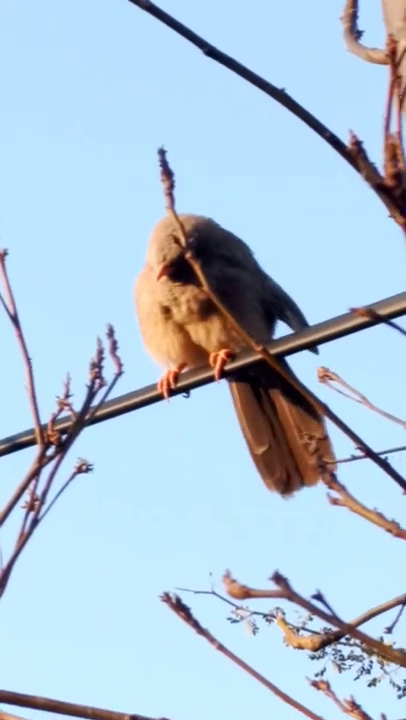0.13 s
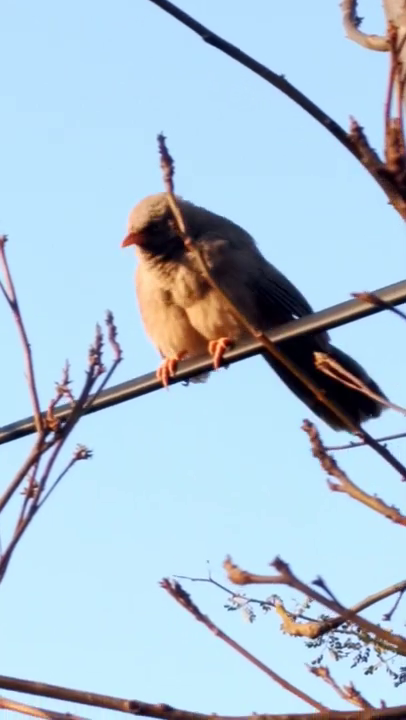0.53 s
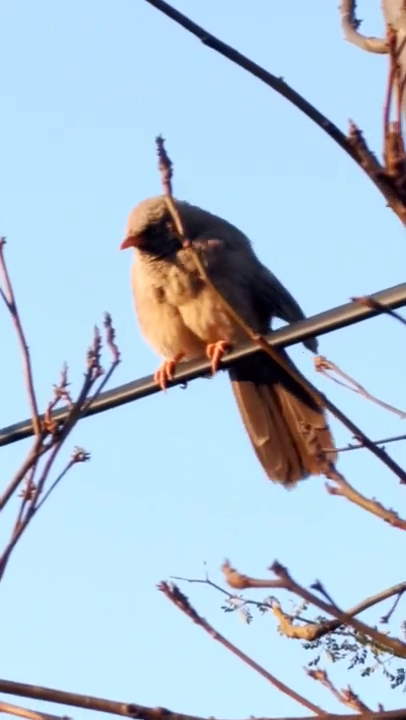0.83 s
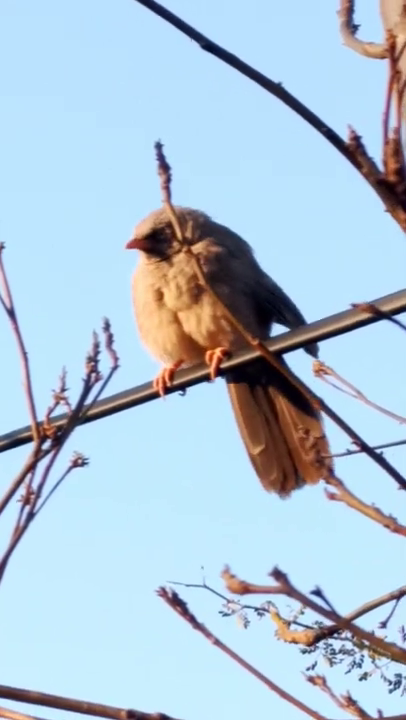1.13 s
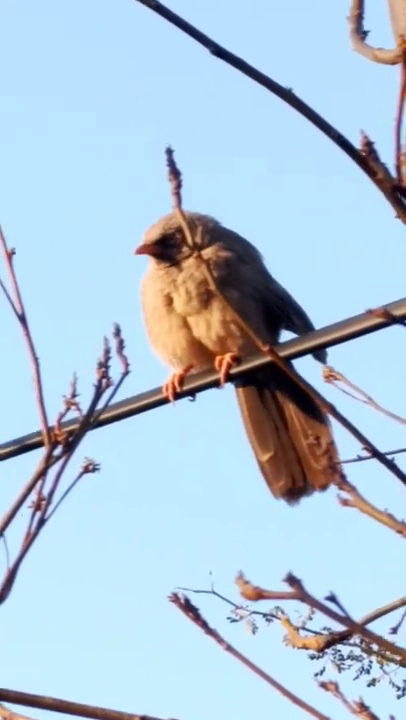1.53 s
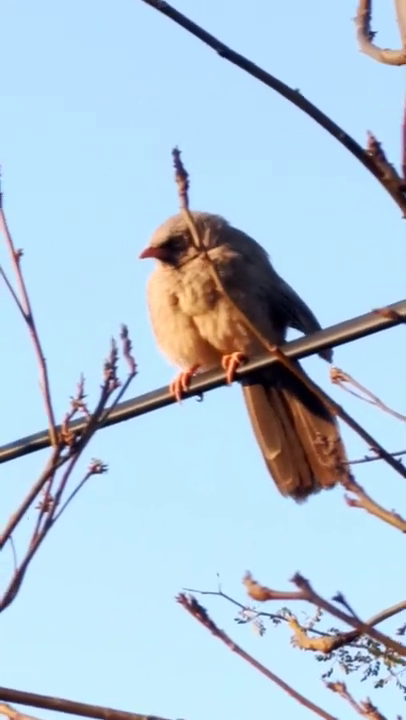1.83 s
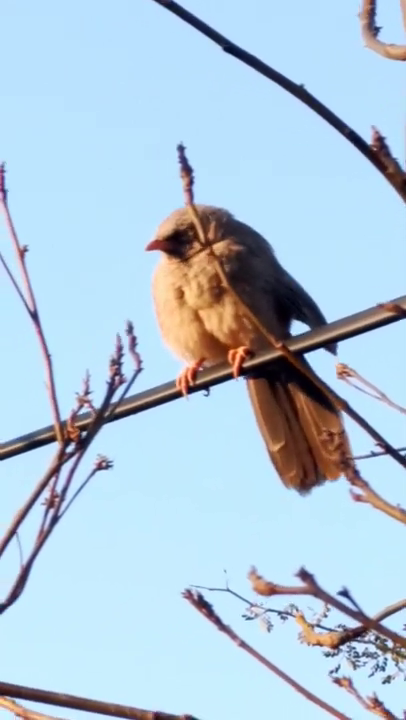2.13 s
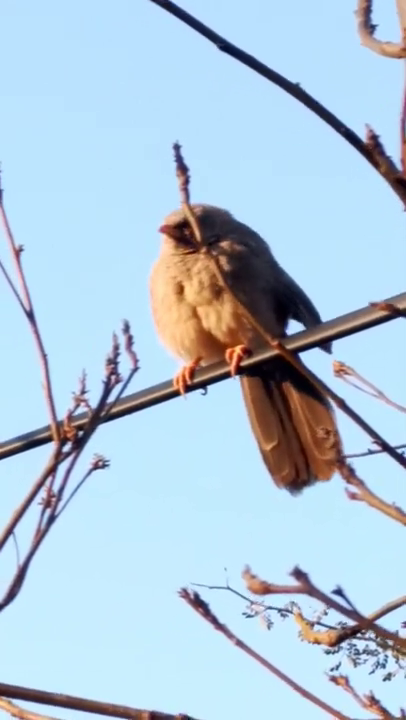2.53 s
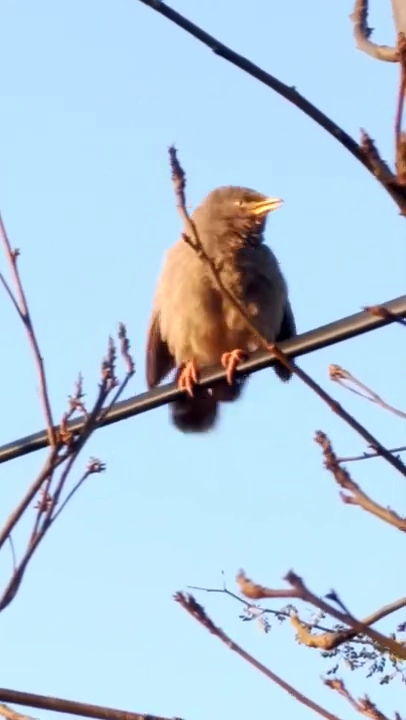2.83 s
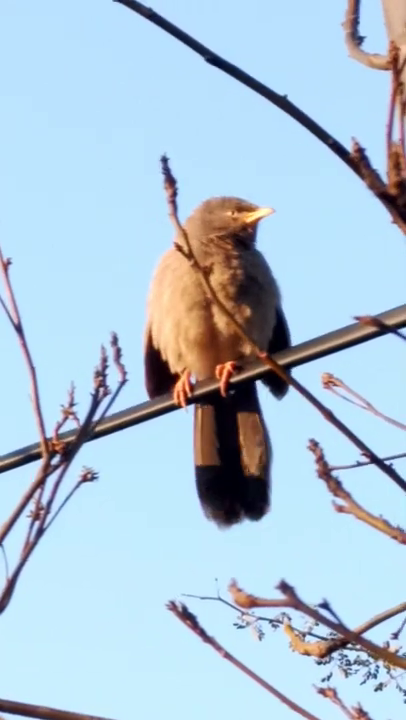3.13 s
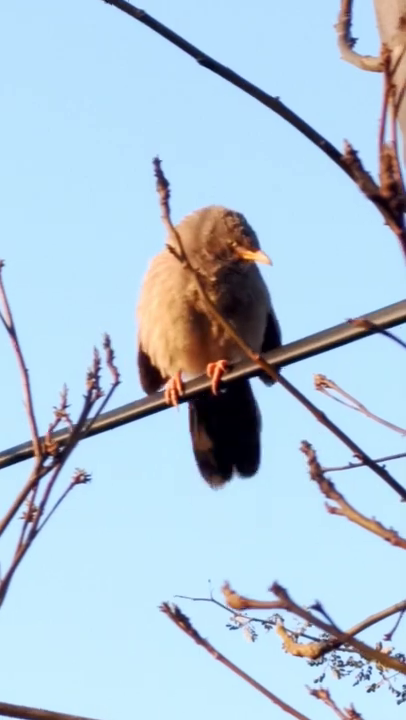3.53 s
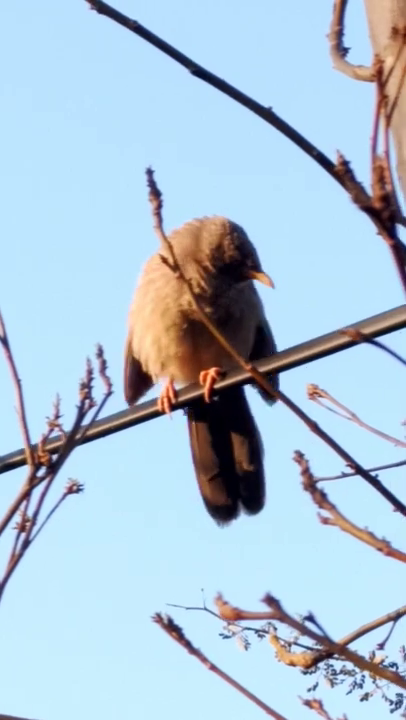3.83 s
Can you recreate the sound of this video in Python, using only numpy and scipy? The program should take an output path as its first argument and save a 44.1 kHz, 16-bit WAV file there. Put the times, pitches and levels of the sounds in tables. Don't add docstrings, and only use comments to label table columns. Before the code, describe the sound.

A bird flock calls from bare trees with harsh squawks, squeals, yelps and small chips outdoors.

```python
import sys
import numpy as np
from scipy import signal
from scipy.fft import rfft, irfft, next_fast_len
from scipy.io import wavfile
from scipy.ndimage import map_coordinates

SR = 44100
rng = np.random.default_rng(int(sys.argv[2]) if len(sys.argv) > 2 else 0)


def ratio(d):
    e = np.asarray(d, float) / 20
    return 10 ** e


def store_pcm(level_fs):
    pcm = np.round(np.clip(level_fs, -1, 1) * 32767).astype(np.int16)
    wavfile.write(sys.argv[1], SR, np.atleast_2d(pcm).T)


N = 176400


def unit(x):
    return x / np.sqrt(np.mean(x ** 2) + 1e-20)


def along(points, hz):
    f, v = np.transpose(points)
    return np.interp(np.log(hz + 1), np.log(f + 1), v)


def wobble(size, rate):
    knots = rng.standard_normal(size // 40 + 9)
    return map_coordinates(knots, [np.arange(size) * min(rate, 1000) / SR])


def coloured(x, points):
    m = next_fast_len(len(x) + 2048)
    gain = ratio(along(points, np.fft.rfftfreq(m, 1 / SR)))
    return irfft(rfft(x, m) * gain, m)[:len(x)]


def add(track, s, x):
    part = track[max(round(s * SR), 0):][:len(x)]
    part += x[:len(part)]


# (time [s], level [dB])
TRAFFIC = [(0, -68), (0.249, -75.5), (.45, -64.5), (0.8, -69), (1.199, -62.5), (1.85, -66.5), (2.2, -73),
           (2.802, -76), (3.1, -67.5), (3.301, -77.5), (3.502, -69.5), (3.801, -82), (4, -76)]
# (frequency [Hz], level per Hz [dB])
RUMBLE = [(15, -73), (25, -24.5), (80, 0), (146, -1), (254, -17.5), (300, -17), (390, -17.5), (660, -120)]
HUM = [(120, -25), (200, -16), (417, -3), (711, -0.5), (1800, -4), (2340, -53), (3960, -120)]
AIR = [(590, -53), (1000, -15), (1990, -2), (3220, 1), (10100, -18.5), (12500, -34.5)]


def background():
    def bed(points):
        below, above = (points[0][0] * .6, -60), (points[-1][0] * 1.6, -60)
        return unit(coloured(rng.standard_normal(N), [below] + list(points) + [above]))

    traffic_db = np.interp(np.arange(N) / SR, *np.transpose(TRAFFIC))
    rumble_db = traffic_db + 1.72 * wobble(N, 13)
    hum_db = -73.5 + 0.74 * (traffic_db - traffic_db.mean()) + wobble(N, 18)
    return ratio(rumble_db) * bed(RUMBLE) + ratio(hum_db) * bed(HUM) + ratio(-82.5) * bed(AIR)


# (frequency [Hz], 60 dB decay time [s])
GROVE_DECAY = [(500, 0.4), (3000, 0.41), (10000, 0.31)]


def grove(x):
    hz, t, z = signal.stft(rng.standard_normal(SR), SR, nperseg=256)
    decay = ratio(-60 * t / along(GROVE_DECAY, hz)[:, None])
    tail = signal.istft(z * decay, SR, nperseg=256)[1]
    return signal.fftconvolve(x, tail / np.linalg.norm(tail))[:N]


def walls(x, echoes):
    return sum(ratio(db) * np.pad(x, (round(s * SR), 0))[:N] for s, db in echoes)


# (frequency [Hz], level [dB])
DISTANCE = [(9500, 0.5), (11500, -35)]


def dulled(x):
    return coloured(x, DISTANCE)


# (time [s], length [s], centre [Hz], width [octaves], level [dB])
RUSTLES = [(0.027, 0.059, 3940, 0.36, -69), (1.821, 0.077, 257, 1.36, -65), (2.063, 0.021, 1380, 0.99, -61),
           (2.09, 0.025, 860, 1.8, -61), (2.222, 0.034, 8700, 1.3, -73), (2.388, 0.0095, 4600, 1.24, -55.5),
           (2.389, 0.029, 7940, 0.75, -66.5), (2.54, 0.096, 5260, 0.47, -66.5),
           (3.394, 0.045, 576, 1.07, -64), (3.403, 0.056, 5450, 0.44, -62), (2.445, 0.17, 2920, 0.26, -74),
           (3.355, .09, 4500, 0.48, -64.5), (2.635, .012, 3440, 0.66, -68), (2.745, 0.011, 4080, 0.59, -67)]


def rustles():
    out, t = np.zeros(N), np.arange(round(SR * .2)) / SR
    for s, length, hz, octaves, db in RUSTLES:
        grains = rng.standard_normal(len(t)) * ratio(1.5 * wobble(len(t), 230))
        edge = 2 ** octaves
        band = [(hz / edge ** 3, -50), (hz / edge, -8), (hz, 0), (hz * edge, -8), (hz * edge ** 3, -50)]
        fade_in = np.clip(t / (0.29 * length), 0, 1)
        fade_out = np.clip((length - t) / (0.1 * length), 0, 1)
        add(out, s, ratio(db) * fade_in * fade_out * unit(coloured(grains, band)))
    return out


# (frequency [Hz], level [dB])
THROAT = [(700, -21), (1300, -11.5), (2700, 3), (6500, -3.5), (16000, -21)]


def voice(pitch, tones, rough, flutter_db, rasp_db, third=0, half=0):
    n = len(pitch)
    phase = 2 * np.pi * np.cumsum(pitch * (1 + rough * wobble(n, 608.4))) / SR
    tone = np.zeros(n)
    for k, db in enumerate(tones, 1):
        audible = k * pitch < SR / 2.2
        tone += ratio(db + flutter_db * wobble(n, 97.5)) * np.sin(k * phase) * audible
    tone = tone * (1 + 2 * third * np.cos(phase / 3) + 2 * half * np.cos(phase / 2))
    rasp = coloured(rng.standard_normal(n) * (1 + np.cos(phase)), THROAT)
    return unit(tone) + ratio(rasp_db) * unit(rasp)


def notes(rows, tones, bend, attack, release, swell_db=0, drop_s=0, drop=1, **throat):
    out, t = np.zeros(N), np.arange(round(SR * .5)) / SR
    for s, length, first, last, db in rows:
        u = np.clip(t / length, 0, 1)
        glide = first + (last - first) * u ** bend
        pitch = glide * (1 - (1 - drop) * np.clip((t - length) / (drop_s + 1e-4), 0, 1))
        shape = np.clip(t / attack, 0, 1) * np.clip((length + drop_s - t) / release, 0, 1)
        add(out, s, ratio(db + swell_db * (u - 1.5)) * shape * voice(pitch, tones, **throat))
    return out


# (time [s], length [s], first pitch [Hz], last pitch [Hz], level [dB])
FAR_SQUEALS = [(0, 0.17, 2216, 1800, -69), (1.33, 0.2, 3386, 3510, -51), (1.33, 0.14, 3292, 3190, -54.5),
               (1.56, 0.044, 3430, 3520, -59), (1.72, 0.15, 3277, 3380, -63), (1.73, 0.24, 3169, 3097, -57),
               (1.94, 0.16, 3240, 3126, -65.5), (.68, 0.092, 3200, 3140, -81),
               (3.33, 0.059, 6350, 6200, -71.5), (3.18, 0.093, 2080, 2600, -78),
               (3.385, 0.093, 4170, 4210, -66), (3.42, 0.082, 2990, 2920, -70.5)]
TRILLS = [
    (2.27, 0.19, 6960, 6800, -82.5),
    (2.45, 0.35, 5990, 5700, -79.5),
    (3.065, 0.038, 6300, 6500, -55.5),
    (3.17, 0.068, 5950, 5650, -73),
    (3.27, 0.081, 6260, 6300, -79),
    (3.69, .16, 6520, 6020, -86.5),
]
COOS = [
    (.09, 0.13, 898, 910, -70),
    (.33, 0.25, 821, 873, -67.5),
    (.56, 0.11, 862, 817, -62.5),
    (.86, 0.12, 792, 675, -64),
    (1.11, 0.29, 805, 685, -66.5),
    (2.42, 0.13, 691, 660, -75.5),
    (3.44, 0.19, 629, 602, -74.5),
]


def far_birds():
    squeals_far = notes(FAR_SQUEALS, [0, -20], 0.96, 0.0051, 0.062, rough=0.0251, flutter_db=5.5, rasp_db=-8)
    trills = notes(TRILLS, [0], 1, .02, .04, rough=.035, flutter_db=5, rasp_db=-16)
    coos = notes(COOS, [0], 2, 0.011, 0.051, rough=.1, flutter_db=4.5, rasp_db=-36)
    return dulled(squeals_far + trills + coos)


# (time the fall starts [s], top pitch [Hz], fall level [dB], rise and hold level [dB])
SWOOPS = [
    (0.342, 7350, -62.5, -82),
    (0.383, 6300, -61.5, -120),
    (3.485, 6680, -56, -73.5),
    (3.926, 6370, -54.5, -67),
]


def swoops():
    rise_s, hold_s, fall_s, tau_s, low_hz = .03, 0.047, 0.097, 0.039, 2247
    lead = rise_s + hold_s
    out, t = np.zeros(N), np.arange(round(SR * .3)) / SR - lead
    rise = np.clip((t + lead) / rise_s, 0, 1) ** 1.2
    fall = np.exp(-(np.clip(t, 0, 1) / tau_s) ** 1.234)
    times = [-lead, -hold_s, .004, .03, fall_s - .03, fall_s + 0.13]
    for s, top, fall_db, hold_db in SWOOPS:
        levels = [hold_db - 13, hold_db, hold_db, fall_db, fall_db, fall_db - 36.5]
        pitch = low_hz + (top - low_hz) * rise * fall
        call = voice(pitch, [0, -24], .011, 4, -18)
        add(out, s - lead, ratio(np.interp(t, times, levels)) * (t < .17) * call)
    return out


# (time [s], pitch [Hz], level [dB])
WHISTLE = [
    (0.796, 3060, -72.5),
    (0.832, 3106, -53.5),
    (0.85, 3200, -64),
    (0.862, 3110, -48),
    (0.918, 3152, -56),
    (0.93, 3118, -43),
    (0.95, 3114, -57),
    (0.962, 3040, -66),
    (0.975, 3100, -63),
]
WHISTLE_TONES = [0, -8, -20.5]


def whistle():
    s, hz, db = np.transpose(WHISTLE)
    t = np.arange(s[0], s[-1], 1 / SR)
    out = np.zeros(N)
    call = voice(np.interp(t, s, hz), WHISTLE_TONES, .002, 1.5, -22)
    add(out, s[0], ratio(np.interp(t, s, db)) * call)
    return out


# (time [s], length [s], first pitch [Hz], last pitch [Hz], level [dB])
CHIRPS = [
    (3.048, .035, 4200, 4900, -63),
    (3.092, .025, 4850, 4200, -64),
    (3.11, .05, 3350, 2700, -60),
    (3.165, .1, 2300, 2100, -64),
    (3.25, .016, 2750, 2500, -63),
    (3.33, .06, 3200, 3100, -69),
    (3.345, .04, 5100, 4100, -67),
    (3.37, .04, 4150, 4050, -68),
    (0, .17, 5900, 5800, -76),
    (.1, .17, 3950, 4150, -77),
]


def chirps():
    return notes(CHIRPS, [0, -18], 1, .008, .01, rough=.015, flutter_db=4, rasp_db=-12)


# (time [s], length [s], first pitch [Hz], last pitch [Hz], level [dB])
CHIPS = [
    (2.484, 0.034, 1570, 1875, -50),
    (2.59, .045, 1618, 1815, -54),
    (2.704, 0.036, 1620, 1895, -43),
    (2.822, 0.032, 1690, 1850, -53),
    (3.635, 0.015, 1600, 1700, -55),
    (3.74, 0.012, 1600, 1680, -59),
]
CHIP_TONES = [-10, 0, -8, -22, -22]


def chips():
    return notes(CHIPS, CHIP_TONES, .6, .012, .006, 17, .008, .9, rough=.006, flutter_db=3, rasp_db=-18)


# (time [s], length [s], first pitch [Hz], last pitch [Hz], level [dB])
YELPS = [
    (.918, 0.108, 2420, 1100, -50),
    (1.345, 0.036, 2400, 1600, -50),
    (1.748, 0.032, 2400, 1600, -52),
]
RASPS = [
    (.97, 0.14, 1692, 1034, -51.5),
    (1.2, 0.074, 1278, 1385, -50.5),
    (1.375, 0.12, 1710, 1306, -63.5),
    (1.66, 0.089, 1300, 1400, -54),
    (1.78, .14, 1604, 1247, -54),
    (3.17, 0.15, 1150, 1113, -75.5),
    (3.36, .09, 2312, 2085, -82),
]
RISES = [
    (1.157, .046, 1200, 2350, -56),
    (1.18, .046, 1200, 2400, -50),
    (1.609, .047, 1200, 2400, -53),
]
YELP_TONES = [-3, 0, -7, -6]
RISE_TONES = [-5, 0, -16, -6]
# (time [s], level [dB])
YELP_ECHOES = [(.027, -5), (.05, -7), (.074, -5)]
# (frequency [Hz], level [dB])
SMALL_THROAT = [(1300, -19), (2100, -4)]


def yelps_and_rasps():
    hoarse = dict(rough=.008, flutter_db=3, rasp_db=-9)
    yelps = notes(YELPS, YELP_TONES, 1.7, 0.006, 0.012, **hoarse)
    rasps = notes(RASPS, [0, 0, -6], 1, .02, .03, rough=.05, flutter_db=5, rasp_db=0)
    rises = notes(RISES, RISE_TONES, 3.7, 0.0057, 0.0013, 1.7, **hoarse)
    return coloured(yelps + walls(yelps, YELP_ECHOES) + rasps + rises, SMALL_THROAT)


# (time [s], length [s], first pitch [Hz], last pitch [Hz], level [dB])
SQUEALS = [
    (1.232, 0.1, 3370, 3506, -41),
    (1.665, .065, 3400, 3224, -44),
]
SQUEAL_TONES = [0, -9, -14]


def squeals():
    return notes(SQUEALS, SQUEAL_TONES, 0.83, 0.03, 0.061, swell_db=7, drop_s=.04, drop=.76,
                 rough=0.017, flutter_db=1.5, rasp_db=-14)


# (time [s], pitch [Hz], level [dB])
SQUAWK_SHAPE = [
    (0, 1411, -15),
    (.012, 1448, 1),
    (.035, 1593, 0.5),
    (0.048, 1562, 1.5),
    (0.056, 1453, 8),
    (0.076, 1239, 3.5),
    (.1, 900, 2.5),
    (0.127, 847.6, -1.5),
    (0.142, 798, -38),
]
# (time [s], peak level [dB], time stretch [ratio], swell depth [ratio])
SQUAWKS = [
    (0.507, -45, 0.94, 0.32),
    (2.907, -37.5, .99, 1.29),
    (3.046, -72.5, 1.7, 0.17),
]
SQUAWK_TONES = [13.5, 14, -2, 0, -2.5, -35, -13]
# (frequency [Hz], level [dB])
BEAK = [(600, -25), (950, -20.5), (1500, -10), (2700, 2), (4300, -6.5), (6200, 0), (10500, -4), (15000, -1)]


def squawks():
    out, t = np.zeros(N), np.arange(round(SR * .3)) / SR
    at, hz, db = np.transpose(SQUAWK_SHAPE)
    for s, peak_db, stretch, depth in SQUAWKS:
        age = t / stretch
        pitch, level = np.interp(age, at, hz), np.interp(age, at, db)
        late = np.clip((age - 0.047) / 0.09 + .5, 0, 1)
        call = voice(pitch, SQUAWK_TONES, rough=.014, flutter_db=3, rasp_db=-15,
                     third=0.5 * (1 - late), half=0.36 * late)
        add(out, s, ratio(peak_db + depth * level) * (t < at[-1] * stretch) * coloured(call, BEAK))
    return out


# (time [s], level [dB])
SQUAWK_ECHOES = [(.027, -9), (.165, -30)]


def scene():
    loud = squawks()
    flock = swoops() + whistle() + chirps() + squeals() + yelps_and_rasps() + chips()
    near = loud + dulled(flock + rustles())
    far = far_birds()
    echoes = dulled(walls(loud, SQUAWK_ECHOES))
    tail = dulled(grove(ratio(-6.5) * near + ratio(-2.5) * far))
    return (near + echoes + far + tail + background())[None]


# (frequency [Hz], level [dB])
MIC = [(4500, 0), (5200, -7), (6500, 0), (7900, -8), (9500, 0), (10900, -2), (12100, -40), (13300, 6)]
# (frequency [Hz], level per Hz [dB])
HISS = [(9000, -43), (11000, 14.5), (14000, 0), (15500, -1)]


def microphone(x):
    hiss = unit(coloured(rng.standard_normal(N), HISS))
    return coloured(x, MIC) + ratio(-100) * hiss


def roll_off(x):
    return signal.sosfilt(signal.butter(12, 15660, fs=SR, output="sos"), x)


def record(dry):
    mix = microphone(dry[0])[None]
    return roll_off(mix)


dry = scene()
out = record(dry)
store_pcm(out)
```